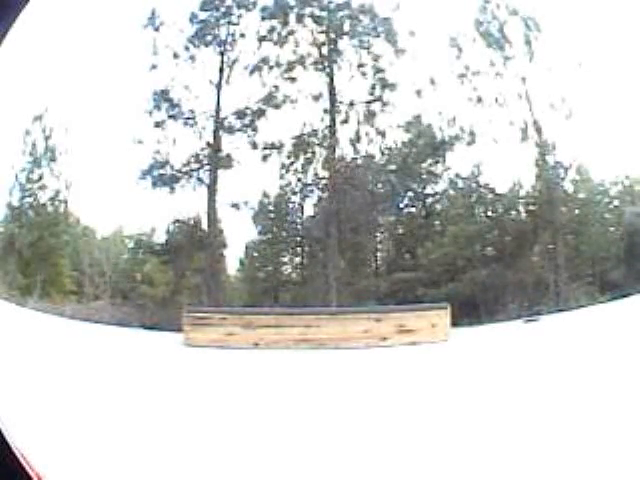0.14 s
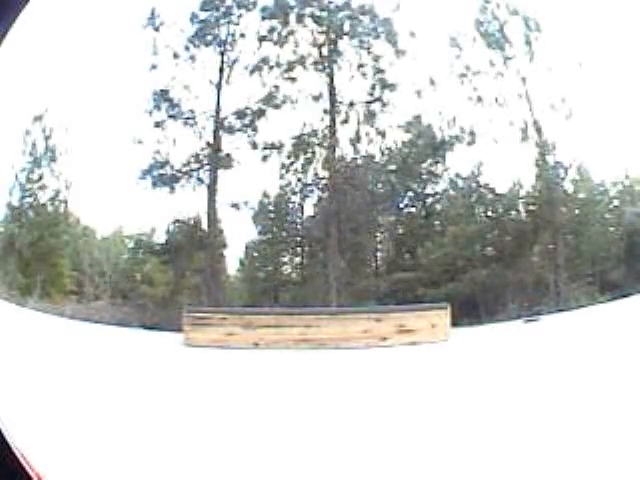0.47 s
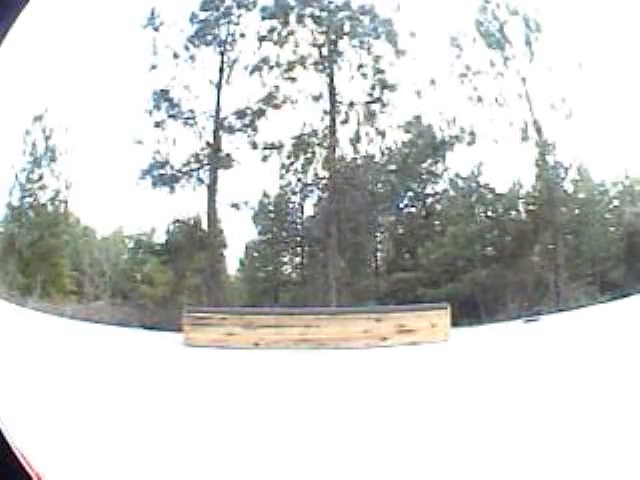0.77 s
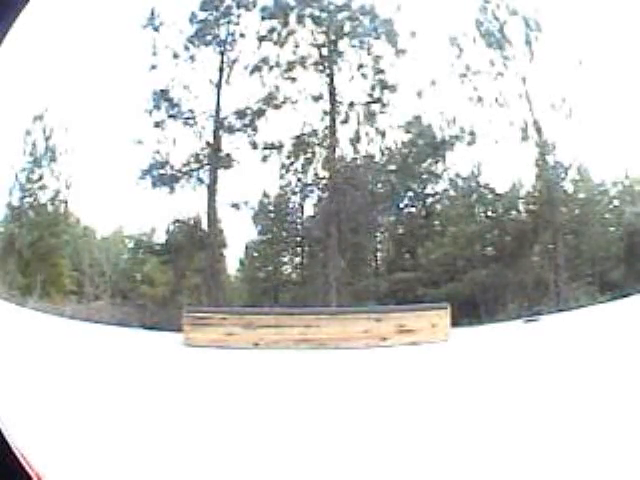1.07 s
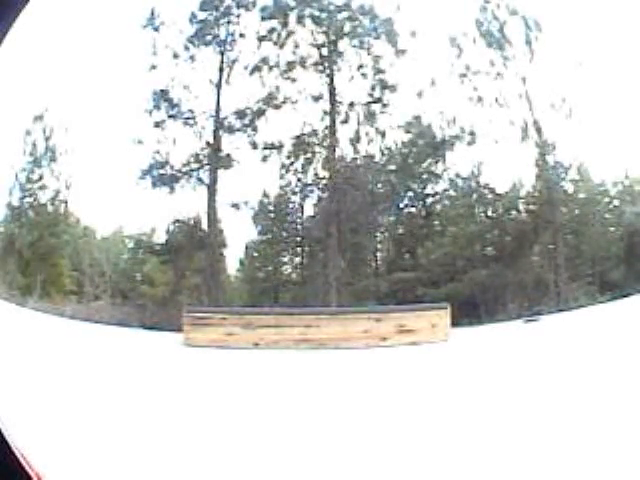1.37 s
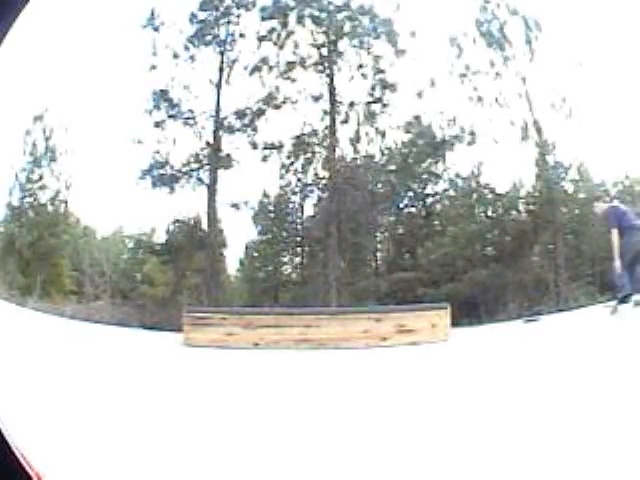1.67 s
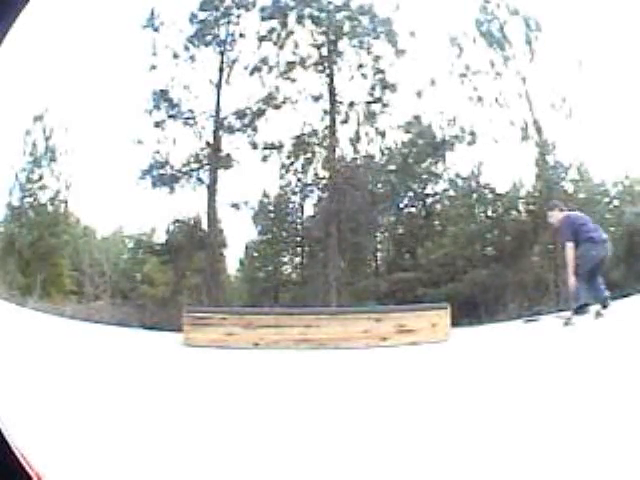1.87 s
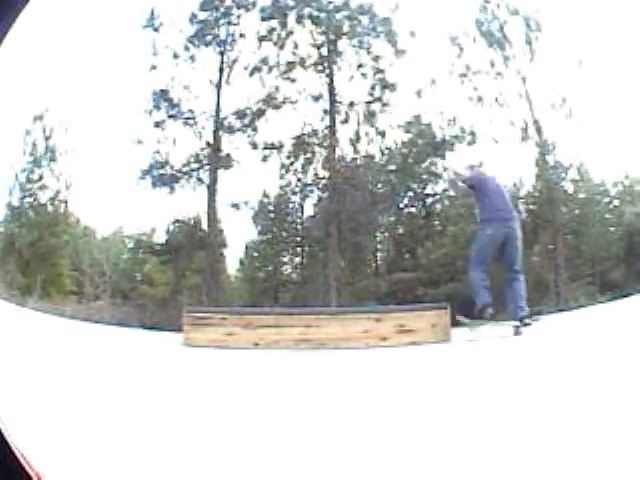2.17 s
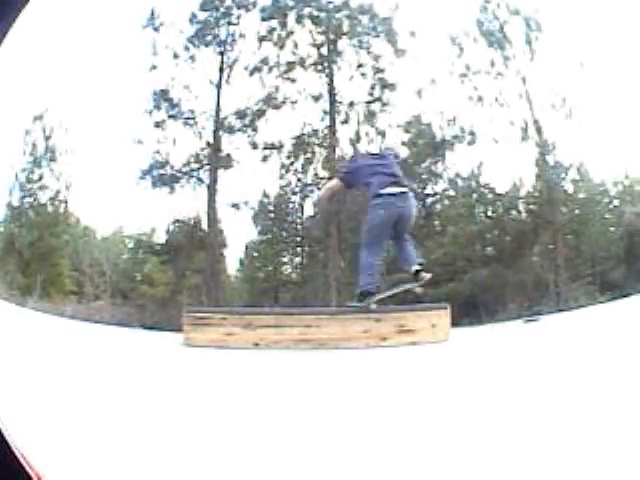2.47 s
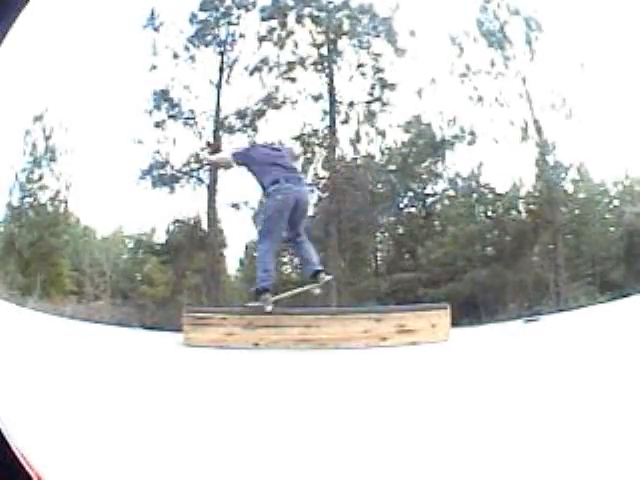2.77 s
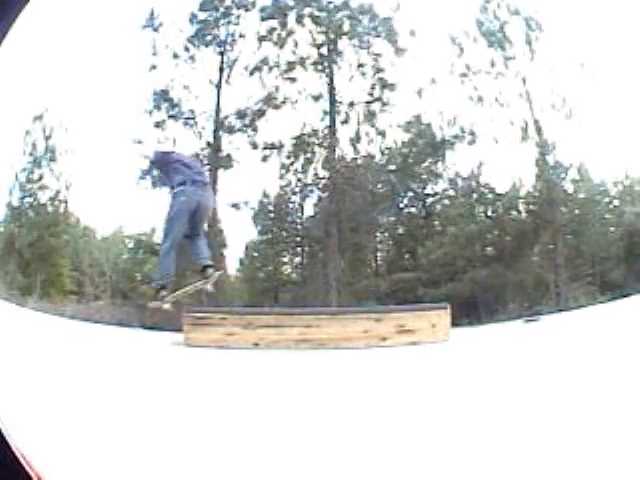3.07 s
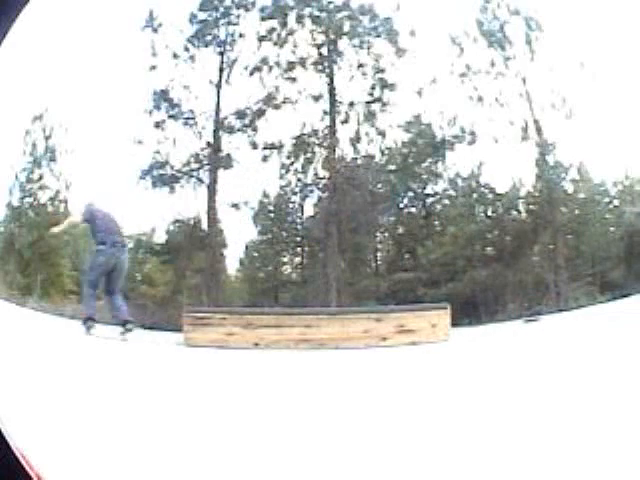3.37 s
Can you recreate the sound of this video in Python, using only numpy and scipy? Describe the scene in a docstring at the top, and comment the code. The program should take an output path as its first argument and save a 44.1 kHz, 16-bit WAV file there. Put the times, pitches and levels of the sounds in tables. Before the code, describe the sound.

Skateboard rolling, snapping up, scraping along a hollow wooden ledge, then landing in light wind.

```python
"""An open yard with hard ground and a hollow wooden ledge, heard from a fixed stereo microphone.
A skateboard rolls in from the right and clacks across a joint, front wheels then back. The tail pops,
the truck locks onto the ledge straight ahead and grinds along its edge in stick and slip; the board
drops off, lands to the left and rolls on. Light wind and a low hum lie underneath;
a limiter holds the blows down."""
import sys
import numpy as np
from scipy import signal
from scipy.fft import rfft, irfft
from scipy.io import wavfile

SR = 44100
rng = np.random.default_rng(int(sys.argv[2]) if len(sys.argv) > 2 else 0)


def unload_wav(signal):
    """Save mono or channel-first audio to the path in sys.argv[1] as 16-bit WAV at rate SR, clipped to [-1, 1]."""
    wavfile.write(
        sys.argv[1],
        SR,
        np.round(np.clip(np.atleast_2d(signal).T, -1, 1) * 32767).astype(np.int16),
    )


N = 155232
TIME = np.arange(N) / SR
CUTOFF_HZ = 7950


def amp(db):
    """Decibels to gain."""
    return 10 ** (np.asarray(db) / 20)


def unit(x):
    """Scale to rms 1."""
    return x / np.sqrt(np.mean(x ** 2) + 1e-20)


def in_time(rows):
    """Each column of a timed curve, at every sample."""
    times, *columns = np.transpose(rows)
    return [np.interp(TIME, times, column) for column in columns]


def drift(hz):
    """Slow random wander, mostly below hz, rms 1."""
    step = 40
    r = np.exp(-2 * np.pi * hz * step / SR)
    slow = signal.lfilter([1], [1, -2 * r, r * r], rng.standard_normal(N // step + 2002))[2000:]
    return np.interp(np.arange(N) / step, np.arange(len(slow)), unit(slow))


def colour(x, spectrum):
    """Minimum-phase filter with the given spectral shape and unit power gain below the cutoff."""
    size = 4096
    hz, db = np.transpose(spectrum)
    bins_hz = np.maximum(np.arange(size // 2 + 1) * SR / size, 1)
    gain = amp(np.interp(np.log(bins_hz), np.log(hz), db))
    cepstrum = irfft(np.log(gain))
    cepstrum[1:size // 2] *= 2
    cepstrum[size // 2 + 1:] = 0
    response = np.exp(rfft(cepstrum))
    power = np.mean(abs(response) ** 2 * (bins_hz < CUTOFF_HZ))
    return signal.fftconvolve(x, irfft(response) / np.sqrt(power))[:N]


def ring(x, hz, t60):
    """A unit click sets a sine of height 1 ringing."""
    r, w = amp(-60 / (t60 * SR)), 2 * np.pi * hz / SR
    return signal.lfilter([0, np.sin(w)], [1, -2 * r * np.cos(w), r * r], x + 1e-18)


def resonate(x, hz, width_hz):
    """One resonance driven by x, rms 1."""
    r = np.exp(-np.pi * width_hz / SR)
    return unit(signal.lfilter([1, 0, -1], [1, -2 * r * np.cos(2 * np.pi * hz / SR), r * r], x))


def rough_tone(hz, width_hz):
    """Noise passed twice through one resonance, rms 1."""
    return resonate(resonate(rng.standard_normal(N), hz, width_hz), hz, width_hz)


def grains(per_s, spread_db):
    """Random tiny contacts of uneven size, rms 1."""
    sizes = amp(spread_db * np.minimum(rng.exponential(1, N), 4))
    return unit(sizes * rng.choice([-1, 1], N) * (rng.random(N) < per_s / SR))


def clicks(times, gains):
    """Single clicks at the given times."""
    out = np.zeros(N)
    out[(np.asarray(times) * SR).astype(int)] = gains
    return out


# Wind spectra, common to both channels and opposed between them: (frequency [Hz], relative level [dB])
WIND_MID = [(25, -17.5), (60, -3.5), (110, 0.5), (250, -7), (1000, -3.5), (1700, -10), (2500, -19),
            (4000, -25), (8000, -43.5)]
WIND_SIDE = [(40, -4.5), (70, -7), (200, -12.5), (1000, -4.5), (8000, -38)]

def wind():
    """Light wind, off in the trees and right on the microphone."""
    mid = amp(-33.5) * colour(rng.standard_normal(N), WIND_MID)
    side = amp(-39.5) * colour(rng.standard_normal(N), WIND_SIDE)
    return mid + side * [[1], [-1]]


def hum(hz=65.3, fall_db_per_s=4.5):
    """A wavering low hum in the background that slowly fades."""
    level_db = -36 - fall_db_per_s * TIME + 2 * drift(2.9)
    return np.sqrt(2) * amp(level_db) * np.sin(2 * np.pi * hz * TIME + .5 * drift(2.6))


# The wheels as they pass the microphone: (time [s], rumble level [dB], hiss level [dB])
ROLL_LEVELS = [(0, -28, -57.5), (1.08, -25, -50.5), (1.3, -25.5, -45), (1.47, -27, -46.5),
               (1.53, -21.5, -42), (1.65, -26, -46), (2.2, -23.5, -39), (2.29, -25.5, -47),
               (2.35, -38, -36), (2.42, -32.5, -47), (3.36, -32.5, -48.5), (3.39, -21, -69),
               (3.52, -27, -48)]
# Spectra of wheels on hard ground: (frequency [Hz], relative level [dB])
RUMBLE_SPECTRUM = [(50, -35), (100, 3), (140, 5), (260, 2.5), (400, 4), (620, -2), (1000, -5.5),
                   (1600, -9.5), (2020, -16), (2600, -25), (3700, -30.5), (8000, -48)]
HISS_SPECTRUM = [(500, -21), (1500, -2.5), (2500, 10), (3500, -2), (5000, -2), (7200, 3.5), (8200, -15.5)]
# The ground under the wheels: (start [s], end [s], pitch [Hz], level [dB], width [share of pitch])
GROUND_DRONES = [(1.084, 1.87, 140.2, -34.5, 0.059), (1.254, 1.723, 368, -27, 0.33),
                 (1.824, 2.294, 223, -26, 0.13), (2.023, 2.285, 780, -26.5, 0.35)]

def wheels():
    """Wheels run over fine grit: rumble, a faint ring, hiss and passing drones of the ground."""
    rumble_db, hiss_db = in_time(ROLL_LEVELS)
    flutter_db = 0.57 * drift(22)
    rumble = colour(grains(per_s=8000, spread_db=1.27), RUMBLE_SPECTRUM)
    wheel_ring = amp(-18) * resonate(rng.standard_normal(N), hz=1668, width_hz=88)
    hiss = colour(grains(per_s=14000, spread_db=4.5), HISS_SPECTRUM)
    out = amp(rumble_db + flutter_db) * (rumble + wheel_ring) + amp(hiss_db + flutter_db) * hiss
    for start, end, hz, db, width in GROUND_DRONES:
        progress = np.clip((TIME - start) / (end - start), 0, 1)
        swell = np.sqrt(np.maximum(np.sin(np.pi * progress), 0))
        out += amp(db) * swell * rough_tone(hz, width * hz)
    return out


# Blows on the board, from the joint through tail pop and ledge to the landing:
# (time [s], thud level [dB], knock level [dB], crack level [dB], rattle time constant [s])
BOARD_BLOWS = [(0.8923, -15, -15.5, -25.5, 0.0053), (0.8953, -2.5, -13.5, -25, 0.009),
               (0.909, -18, -23, -30.5, 0.036), (1.0096, -14, -10.5, -21.5, 0.0032),
               (1.0138, -2.5, -13, -31, 0.0016), (1.0199, -5, -11.5, -27, 0.0048),
               (1.390, -14.5, -22.5, -26.5, 0.005), (2.3413, -21, -4, -0.5, 0.0033),
               (2.5216, -3.5, -12, -14.5, 0.014), (2.524, -21, -26, -9.5, 0.0019),
               (2.537, -5.5, -8, -35, 0.0039), (2.553, -15, -14, -30, 0.027),
               (2.687, -22.5, -17.5, -24.5, 0.0047), (2.789, -21, -13.5, -29, 0.0082),
               (2.845, -15, -19.5, -39, 0.01), (2.865, -28, -19, -40, 0.0044),
               (2.945, -22.5, -22, -33, 0.014), (3.005, -14.5, -28, -38, 0.007),
               (3.032, -19, -13, -29, 0.009), (3.091, -23, -15.5, -31, 0.0079),
               (3.3626, -40, -10, -51, 0.0019), (3.3691, -4.5, -3, -10.5, 0.0053),
               (3.377, -5.5, -13.5, -44, 0.011)]
# Low, middle and high spectra of a blow: (frequency [Hz], relative level [dB])
THUD_SPECTRUM = [(35, -47.5), (70, 1.5), (130, -14.5), (230, 0.5), (330, -2), (560, -2.5), (800, -3.5),
                 (1600, -62)]
KNOCK_SPECTRUM = [(200, -36.5), (480, -8.5), (750, -1), (1050, 10), (1400, 8.5), (1750, 3), (2400, -11.5),
                  (4000, -37.5)]
CRACK_SPECTRUM = [(900, -8.5), (1900, 9), (2600, 5), (3200, -2.5), (4400, -4), (7000, -7), (8200, -21.5)]
# Modes of the deck: (frequency [Hz], relative level [dB], t60 [s])
DECK_MODES = [(227, -12.5, 0.11), (572, -14.5, 0.034), (860, -9, 0.038), (1192, -15.5, 0.042)]

def blows(snap_share=0.3, deck_db=6):
    """Each blow is a snap and a dying rattle, heard as thud, knock and crack; the deck rings on."""
    times, thud_db, knock_db, crack_db, rattle_s = np.transpose(BOARD_BLOWS)
    bands = (THUD_SPECTRUM, thud_db), (KNOCK_SPECTRUM, knock_db), (CRACK_SPECTRUM, crack_db)
    out = np.zeros(N)
    for spectrum, levels in bands:
        force, rattle = np.zeros(N), grains(per_s=9000, spread_db=2.0)
        for at, db, tau in zip((times * SR).astype(int), levels, rattle_s):
            burst = rattle[at:] * np.exp(-np.minimum(TIME[:N - at] / tau, 20))
            burst[0] = snap_share * np.sqrt(tau * SR / 2)  # first contact, sized against the rattle
            force[at:] += amp(db) * burst
        out += colour(force, spectrum)
    for hz, db, t60 in DECK_MODES:
        strike_db = knock_db + db + deck_db + rng.standard_normal(len(times))
        out += ring(clicks(times, amp(strike_db)), hz, t60)
    return out


# Wheel or truck under a hard blow: (time [s], pitch [Hz], level [dB])
HARDWARE_CLINKS = [(.896, 3436, -17), (1.0101, 2960, -20), (2.3424, 2230, -6), (2.687, 2410, -21.5),
                   (2.945, 1240, -10), (3.034, 1365, -9.5), (3.034, 3330, -17.5)]

def clinks(t60_cycles=68):
    """Wheel and truck ring briefly, at a pitch that depends on where they are hit."""
    return sum(ring(clicks(at, amp(db)), hz, t60_cycles / hz) for at, hz, db in HARDWARE_CLINKS)


# Booms at the joint, then at the ledge: (start [s], pitch [Hz], level [dB], rise [s], t60 [s])
LOW_BOOMS = [(0.901, 212, -10, 0.0042, 0.16), (0.915, 132, -11.5, 0.0099, 0.26),
             (2.586, 62, -16, 0.007, 0.28), (3.085, 228, -17.5, 0.011, 0.43),
             (3.107, 169.5, -15.5, 0.0061, 0.36)]

def booms(pitch_waver=0.098):
    """Ground and ledge boom under the board: low wavering tones that swell and die."""
    out = np.zeros(N)
    for start, hz, db, rise, t60 in LOW_BOOMS:
        age = np.maximum(TIME - start, 0)
        phase = 2 * np.pi * hz * np.cumsum((age > 0) * (1 + pitch_waver * drift(30))) / SR
        attack = 1 - np.exp(-age / rise)
        decay_db = 60 * np.maximum(age - 2 * rise, 0) / t60
        out += amp(db - decay_db) * attack * np.sin(phase)
    return out


# Scuffs and, in the second row, the tail slap:
# (peak time [s], rise [s], fall [s], rasp level [dB], grit level [dB])
SCUFFS_AND_SLAP = [(2.334, 0.012, 0.0043, -21.5, -39), (2.351, 0.0014, 0.01, -10.5, -29),
                   (2.392, 0.016, 0.0069, -19, -21.5), (2.437, 0.012, 0.012, -21, -39.5),
                   (2.574, 0.008, 0.01, -19.5, -21), (3.418, 0.0092, 0.025, -15, -28)]
# Their dull and bright spectra: (frequency [Hz], relative level [dB])
RASP_SPECTRUM = [(300, -10), (700, -3), (1100, -3.5), (1550, 1), (1950, -10.5), (2600, -16.5), (4000, -41)]
GRIT_SPECTRUM = [(1000, -2), (2300, 6), (3300, 3.5), (7000, -4.5), (8200, -18.5)]

def scuffs_and_slap():
    """A sharp tail slap just after the pop, and short gritty scuffs around take-off and landing."""
    rasp_gain = grit_gain = 0
    for peak, rise, fall, rasp_db, grit_db in SCUFFS_AND_SLAP:
        age = TIME - peak
        exponent = np.where(age < 0, (age / rise) ** 2, age / fall) / 2
        swell = np.exp(-exponent.clip(0, 30))
        rasp_gain += amp(rasp_db) * swell
        grit_gain += amp(grit_db) * swell
    rasp = colour(rasp_gain * grains(per_s=4000, spread_db=2.5), RASP_SPECTRUM)
    grit = colour(grit_gain * grains(per_s=5000, spread_db=2), GRIT_SPECTRUM)
    return rasp + grit


# The truck on the edge, in front of the microphone: (time [s], level [dB])
GRIND_LEVELS = [(2.52, -49), (2.53, -11.5), (2.58, -16.5), (2.62, -26.5), (2.735, -21), (2.775, -28.5),
                (2.81, -21.5), (2.85, -22), (2.89, -26.5), (2.935, -24.5), (2.97, -23), (3.02, -24.5),
                (3.1, -17.5), (3.145, -17.5), (3.22, -36)]
# Broad spectrum of the scrape: (frequency [Hz], relative level [dB])
SCRAPE_SPECTRUM = [(60, -11.5), (150, -3.5), (240, 4), (330, 1), (820, -1.5), (1500, -2.5), (2000, -11.5),
                   (3000, -20.5), (4500, -41), (8000, -48)]
# Resonances of board and ledge: (frequency [Hz], width [Hz], relative level [dB])
SCRAPE_MODES = [(243, 19, -12.5), (413.7, 8.1, -9.5), (807, 24, -11.5), (1226, 25, -13.5),
                (1390, 48, -15.5)]

def grind(flutter_db=4):
    """The truck sticks and slips along the edge and drives the resonances of board and ledge."""
    level_db, = in_time(GRIND_LEVELS)
    on_edge = (TIME > GRIND_LEVELS[0][0]) & (TIME < GRIND_LEVELS[-1][0])
    slips = grains(per_s=1600, spread_db=2.2) * amp(flutter_db * np.tanh(drift(45)))
    scrape = amp(-1.5) * colour(slips, SCRAPE_SPECTRUM)
    ringing = sum(amp(db) * resonate(slips, hz, width) for hz, width, db in SCRAPE_MODES)
    return amp(level_db) * on_edge * (scrape + ringing)


# The rider's weight comes down on the ledge: (time [s], level [dB])
LEDGE_LOADS = [(2.544, 3.5), (2.562, 2.5), (2.583, -8.5)]
# Modes of the hollow wood: (frequency [Hz], relative level [dB], t60 [s])
LEDGE_MODES = [(123.4, -14.5, 0.26), (147, -14, 0.27), (314.6, -5.5, 0.15), (420, -8.5, 0.25),
               (525, -10.5, 0.043), (566, -14, 0.049), (793, -14.5, 0.093)]

def ledge():
    """The hollow ledge rings under the rider's weight, its modes alternating in sign."""
    times, load_db = np.transpose(LEDGE_LOADS)
    out = np.zeros(N)
    for k, (hz, db, t60) in enumerate(LEDGE_MODES):
        strike_db = load_db + db + rng.standard_normal(len(times))
        out += (-1) ** k * ring(clicks(times, amp(strike_db)), hz, t60)
    return out


# The truck catches on the edge: (peak time [s], half length [s], pitch [Hz], level [dB])
TRUCK_SQUEAKS = [(2.84, 0.0079, 3840, -35.5), (2.916, 0.091, 3970, -49.5), (3.09, 0.0037, 3590, -32.5),
                 (3.107, 0.041, 3410, -40.5)]

def squeaks():
    """Short rough squeals where the slipping drives one narrow resonance of the truck."""
    out = np.zeros(N)
    for peak, half_s, hz, db in TRUCK_SQUEAKS:
        swell = np.exp(-.5 * np.minimum(abs(TIME - peak) / half_s, 10) ** 2)
        out += amp(db) * swell * rough_tone(hz, width_hz=210)
    return out


def yard(x, t60=0.14, low_cut_hz=417, level_db=-6.5):
    """Brief thin scatter from nearby ground and trees, different on each side of the microphone."""
    age = TIME[:SR // 2]
    tails = rng.standard_normal((2, len(age))) * amp(-60 * age / t60)
    tails /= np.sqrt(np.sum(tails ** 2, axis=1, keepdims=True))
    thin = signal.sosfilt(signal.butter(2, low_cut_hz, "high", fs=SR, output="sos"), x)
    return amp(level_db) * signal.fftconvolve(thin, tails, axes=1)[:, :N]


# The board's path across the microphone: (time [s], left minus right [dB])
BOARD_PAN = [(0, -10), (1, -9), (2.35, -3.5), (2.53, -1), (3.2, 0.4), (3.37, 5.5), (3.41, 0)]

def scene(pan_above_hz=540):
    """The board crosses from right to left and ends in the centre; its bass stays centred throughout."""
    pan_db, = in_time(BOARD_PAN)
    board = wheels() + blows() + clinks() + booms() + scuffs_and_slap() + grind() + ledge() + squeaks()
    bass = signal.sosfiltfilt(signal.butter(2, pan_above_hz, fs=SR, output="sos"), board)
    placed = bass + (board - bass) * amp([pan_db / 2, -pan_db / 2])
    return placed + yard(placed) + wind() + hum()


def record(dry, limit_db=-1.5, attack_s=0.00079, release_db_per_s=62):
    """Behind the microphone a limiter ducks after loud blows; first peaks clip and the top is cut."""
    peak_db = 20 * np.log10(abs(dry).max(axis=0) + 1e-9)
    over_db = np.maximum(peak_db - limit_db, 0)
    release_db = release_db_per_s * TIME
    held_db = np.maximum.accumulate(over_db + release_db) - release_db
    r = np.exp(-1 / (attack_s * SR))
    duck_db = signal.lfilter([1 - r], [1, -r], held_db)
    limited = np.clip(dry * amp(-duck_db), -.85, .85)
    return signal.sosfilt(signal.ellip(10, .3, 80, CUTOFF_HZ, fs=SR, output="sos"), limited)


dry = scene()
out = record(dry)
unload_wav(out)
```